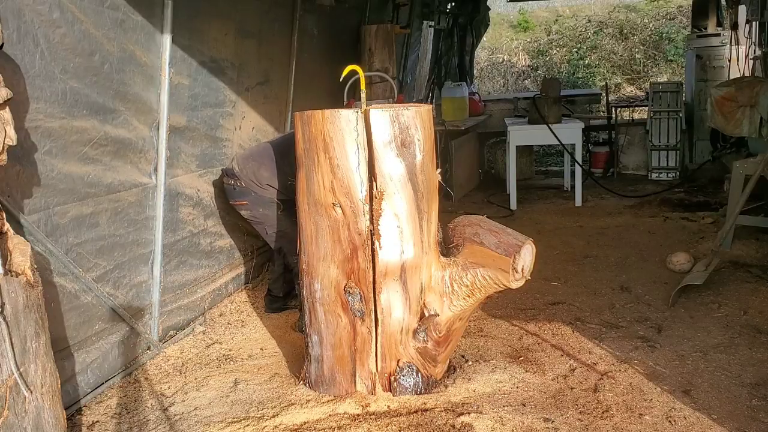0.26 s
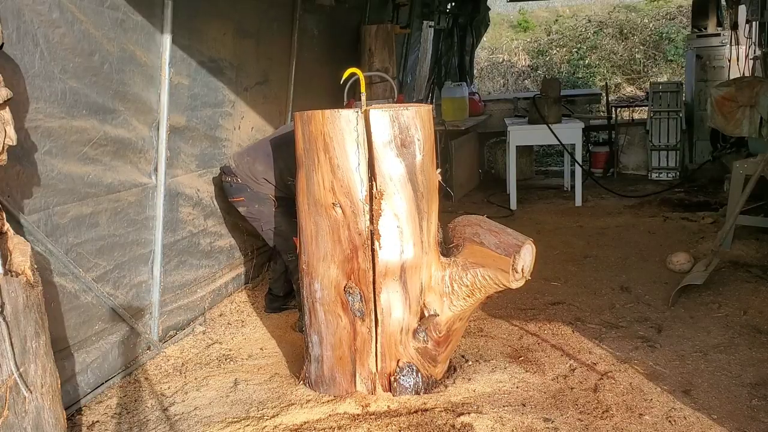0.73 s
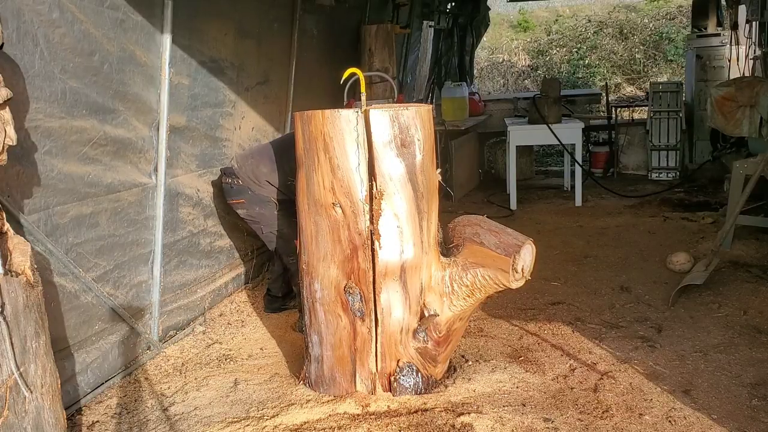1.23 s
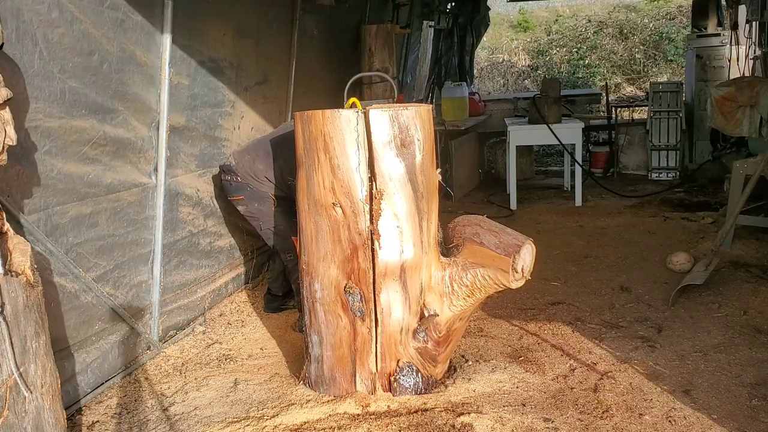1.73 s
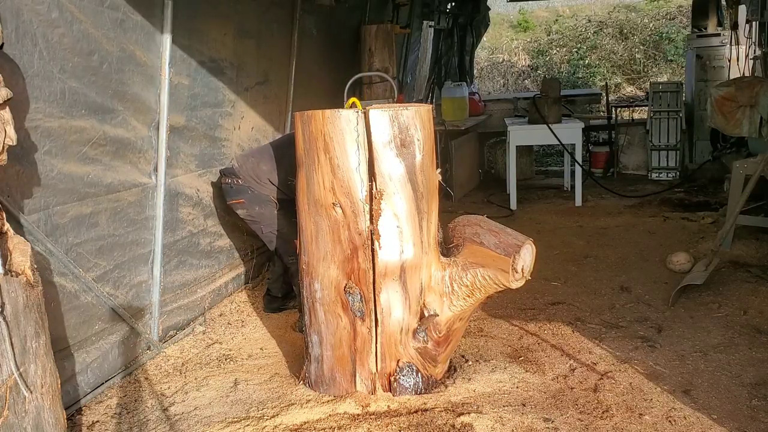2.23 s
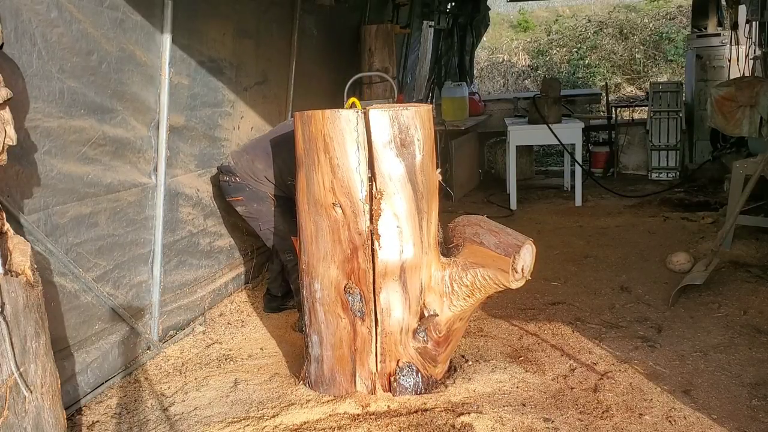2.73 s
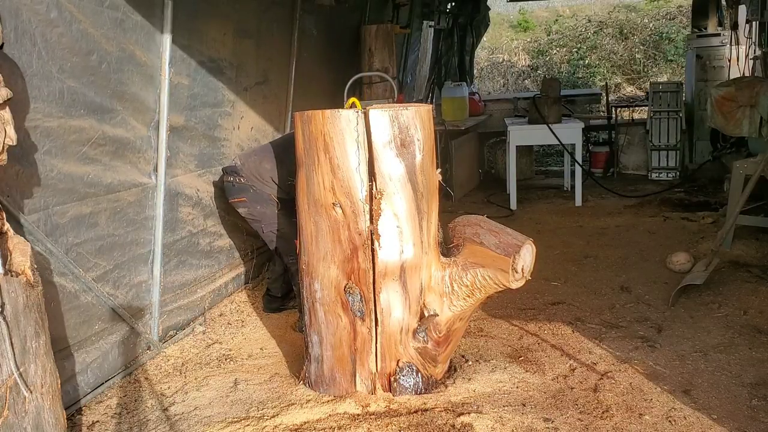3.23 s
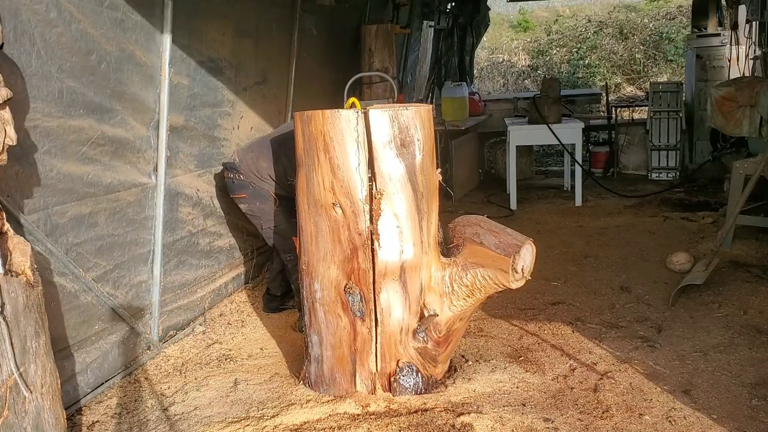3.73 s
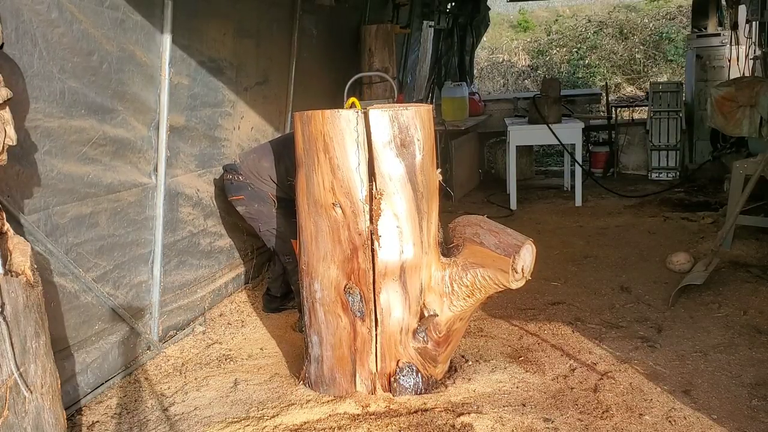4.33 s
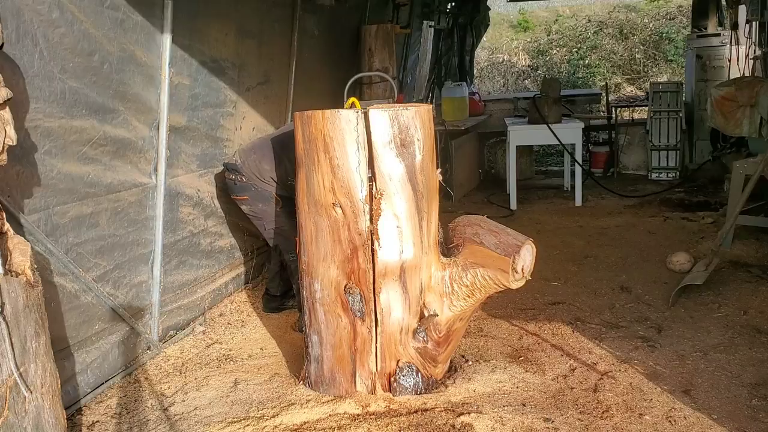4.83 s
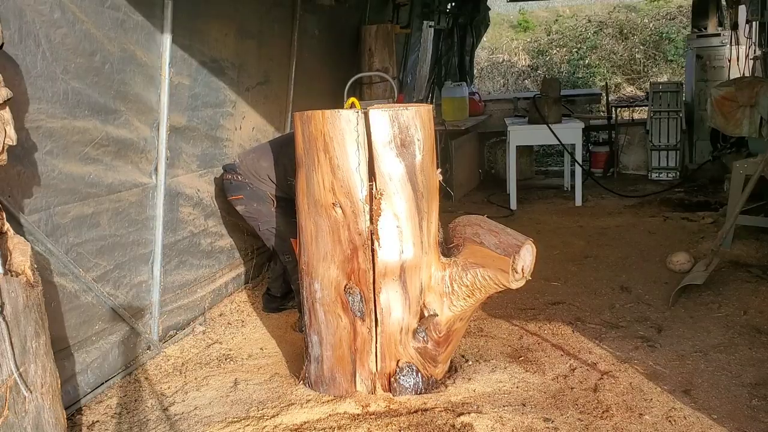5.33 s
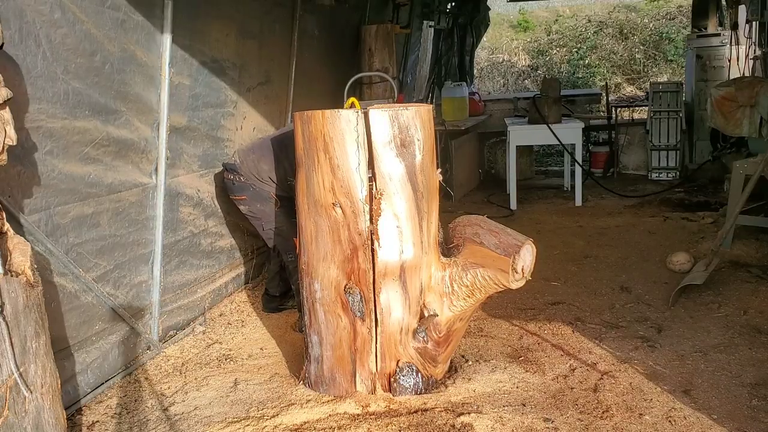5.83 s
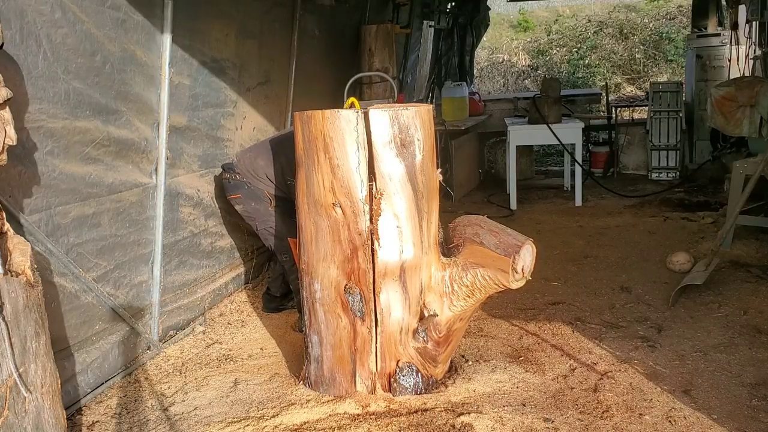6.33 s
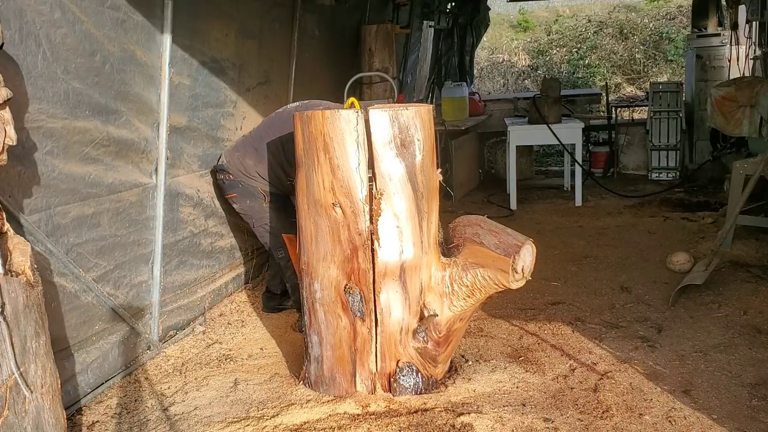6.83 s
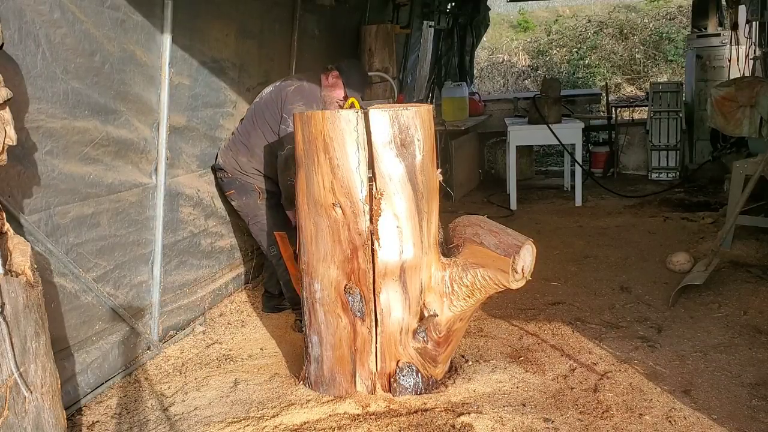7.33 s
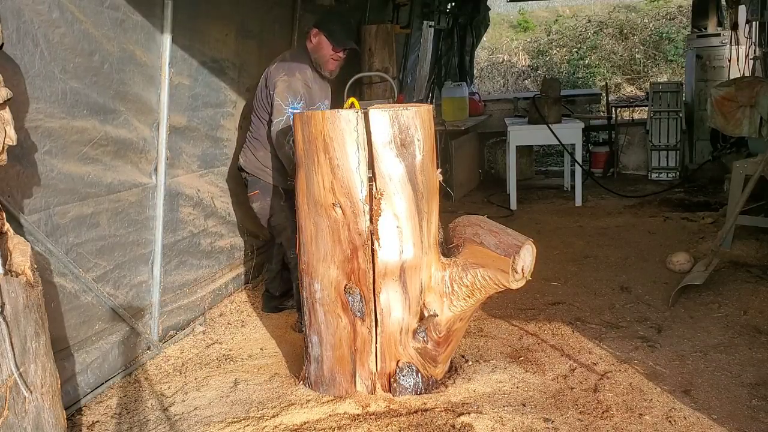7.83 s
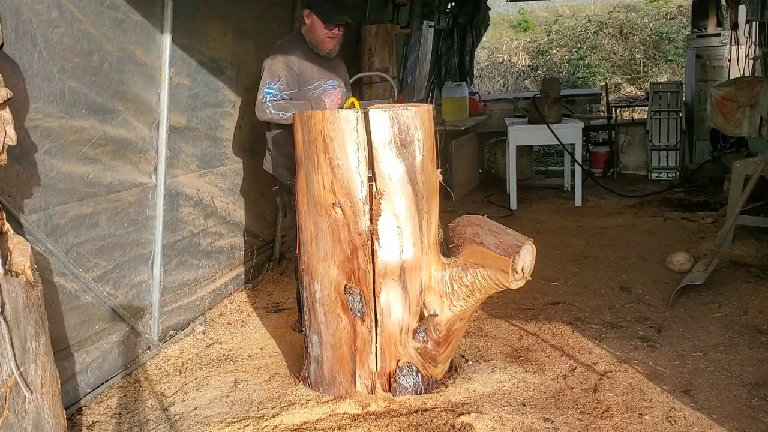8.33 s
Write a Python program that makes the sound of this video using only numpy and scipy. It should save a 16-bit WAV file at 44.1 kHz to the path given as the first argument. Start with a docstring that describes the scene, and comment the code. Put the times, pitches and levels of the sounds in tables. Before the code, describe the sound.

A quiet outdoor shed: faint low wavering rumble, thin airy hiss and soft shuffling of feet and clothes in sawdust. A faint knock comes at 0.3 s. At 0.5 s a steel hammer hits a steel wedge in a big log: low thump, sharp dense crack and bright metallic ring, thickened by quick shed echoes and fading within the second. Further blows land at about 1.4, 2.4, 3.4, 4.3, 5.3 and 6.2 s, each with a different mix of ringing tones and woody note. A wooden knock with a slight metal re-ring follows at 1.6 s, and another right after the fifth blow at 4.4 s. After the last ring dies, gentle rustling continues, with three very faint high chirps: rising at 7.5 s, level at 8.2 s, falling and very brief at 8.4 s. Stereo microphones face the log from the opposite side.

```python
"""A steel hammer drives a steel wedge into a big log under an open shed, on the far side from the microphones.
Throughout, filtered noise gives a distant rumble, shuffling in sawdust and still air; a modal knock comes at 0.3 s.
From 0.5 to 6.2 s come seven blows, about one a second: damped low modes thump, echoing noise bands crack, and
steel modes ring; the shed holds the sound, then it dies away. Knocks follow the second and fifth blows.
From 7.5 s come three faint sine chirps over the background: one rising, one level, one falling."""
import sys
import numpy as np
from scipy import signal
from scipy.fft import rfft, irfft, next_fast_len
from scipy.io import wavfile
from scipy.ndimage import uniform_filter1d

SR = 44100
rng = np.random.default_rng(int(sys.argv[2]) if len(sys.argv) > 2 else 0)


def digitize_waveform(pressure):
    """Quantize a signal to 16-bit integers and store it at the path in sys.argv[1].

    Rows of a 2-D input are taken as channels; values are limited to [-1, 1].
    """
    field = np.atleast_2d(pressure).T
    bounded = np.clip(field, -1, 1)
    quanta = np.round(bounded * 32767).astype(np.int16)
    wavfile.write(sys.argv[1], SR, quanta)


N = 377937

# Pan is always left minus right. Noise spectra give relative levels per hertz; noise() sets the rms to 1.
# Distant rumble: spectrum [f/Hz, level/dB] and its wavering rms [t/s, level/dB]
RUMBLE_SPECTRUM = [(15, -41), (30, -17.5), (55, -6), (75, 2), (110, -14.5), (160, -21.5), (300, -43)]
RUMBLE_LEVEL = [(0.0, -49), (0.33, -56.5), (0.71, -51), (1.29, -58.5), (1.67, -47), (2.22, -57),
                (2.67, -51.5), (2.98, -55), (4.32, -55), (4.42, -53), (5.13, -56), (5.54, -51),
                (5.8, -54.5), (6.52, -47.5), (6.83, -56.5), (7.83, -62.5), (7.99, -57.5), (8.57, -60.5)]
# Feet and clothes in sawdust: spectra of the body of the rustle and of its treble [f/Hz, level/dB]
SHUFFLE_SPECTRUM = [(80, -13.5), (160, -6), (260, -6), (500, -7), (800, -9), (1500, -18.5), (3000, -36.5)]
GRIT_SPECTRUM = [(500, -17), (1200, 0.5), (2300, -6), (3000, -10), (4500, -15), (9000, -34)]
# Movements [start of hold t/s, hold/s, level/dB, treble over body/dB, fall t60/s]
SHUFFLES = [(0.048, 0.034, -70.5, -10, 1.3), (0.31, 0.094, -58.5, -14, .9),
            (1.027, 0.073, -64.5, -12.5, 0.27), (1.783, 0.045, -63.5, -15, 0.86),
            (2.56, .12, -60, -2.5, 1.5), (3.073, .08, -69.5, -10.5, .9), (3.7, .1, -59.5, -14.5, .6),
            (4.651, .15, -70.5, -10.5, 1.3), (5.42, .05, -54, -7, 0.41), (5.7, .04, -71.5, -12, 0.45),
            (5.878, 0.092, -69.5, -17, 0.8), (6.42, 0.055, -54.5, -7.5, 0.99), (6.6, 0.055, -83, -4, .9),
            (7.68, .05, -71, -31, 0.43), (7.84, .08, -66, -23, .9), (7.96, 0.18, -61.5, -16, 0.47),
            (8.296, .11, -69.5, -22, .6)]
BED_DB, BED_TREBLE_DB = -71.5, -10  # steady rustle between movements, and its treble over it
SHUFFLE_RISE = 0.4  # t60 of the swell as a share of the fall's
# Still air: spectrum [f/Hz, level/dB]
AIR_SPECTRUM = [(1500, -12.5), (3000, 1), (5000, -8.5), (6500, -0.5), (8500, -6), (13000, -7), (16500, -2)]
AIR_DB = -87.5
LEFT_LAG = 18  # samples: the background comes from the right
# Chirps [t/s, length/s, from f/Hz, to f/Hz, level/dB]
CHIRPS = [(7.50, .13, 6240, 6400, -78.5), (8.239, .09, 5670, 5670, -83.5), (8.402, .016, 7290, 5210, -80)]
# Knocks [t/s, level/dB, pan/dB, share of t60, thud level/dB]
KNOCKS = [(0.323, -48, 7.5, 0.22, -27), (1.5913, -14.5, -6, 0.54, -25), (4.414, -22, 2.5, 0.35, 6)]
# Modes of the knock: the wood, and the steel wedge ringing again near 2 kHz
# [f/Hz, level/dB, t60/s before the share]
KNOCK_MODES = [(357.8, -2, 0.51), (418, -11.5, 0.25), (529, -1.5, 0.26), (612, 7.5, .07), (880, -1.2, 0.35),
               (990, 1, 0.1), (1260, -13.5, 0.14), (2043, -21, .4)]
# Spectrum of the shed's answer to a knock [f/Hz, level/dB]
KNOCK_SPECTRUM = [(100, -16), (400, 1), (1000, -3), (2500, -24), (6000, -32.5), (15000, -53)]
# Blows [t/s, pan of thump and crack/dB, thump/dB, swell time of the ring/s, far return over the usual/dB,
#  crack (wood/dB, log note f/Hz, its rise/dB, steel/dB, treble slope/dB per octave),
#  gain of upper twins/dB, (level/dB of each mode family, set by where the face lands),
#  (pan/dB of each family, as the hammer turns), (share of t60 for each grip)]
BLOWS = [(0.4962, -3.5, -25.5, 0.016, -0.5, (-0.4, 467.5, 11, 1, 0.5),
         -2.5, (-6, -13.5, 1.5, -5.5, -13, 7, -3.5), (-4, -6, -3, -2, 6.5, -.1, -6.5),
         (0.92, 0.37, 0.73, 0.42)), (1.407, 0.85, -25.5, 0.011, 4.66, (0.3, 559.5, 6, 3.4, -1.8),
         -0.5, (-13, 8.5, -2.1, 8, 8.5, 8.5, -10), (4, 1.7, 1.1, 3, -0.5, 3.5, -5.5),
         (0.95, 0.72, 0.62, .6)), (2.378, -1.75, -25, 0.022, 1.3, (0.2, 517.5, 12, 4, 0.5),
         4, (-4.5, -7.5, 2, 14.5, 15, 2.7, 6), (8.5, 2.5, -10.5, 1.5, 0.5, 2.5, 3.5),
         (.8, 1.295, 0.86, 0.58)), (3.372, 3.5, -21.5, 0.02, 0.5, (0.7, 281, 11.5, 3, -4.5),
         3, (-8.5, -8, -7.5, -10, -12, 3.5, -0.2), (4.5, -3.5, 6, 1, 6.5, 6.5, -3),
         (0.92, 0.95, 1.56, 1.42)), (4.349, -0.5, -30, 0.016, -2.2, (1.5, 397, 1, 1.1, -5.5),
         -1, (5.5, -10.5, 4, 3, -12.5, -9.5, 5.5), (6, 12, 1, 3.5, 0.5, -6, 8.5), (0.76, .45, 1.2, 1.2)),
         (5.297, -0.3, -24, 0.036, -4.5, (3.5, 426, 7, -0.6, -4.5), -3, (5, 5, -5.5, -4, 1, -5, -7),
         (3, -7, 9, -7, -6, 4.5, -15), (0.86, 0.31, 0.91, 0.89)),
         (6.248, -9, -30, 0.033, -0.5, (2.55, 428, 8.5, -2.5, -3.5),
         -2.7, (8, -12, -0.5, 4, -9.5, -6.5, 5.5), (-7, 2.5, 5, 3.5, -8.5, -0.5, -4.5),
         (0.97, .3, 0.76, 0.68))]
# Low modes of the log and the ground under it [f/Hz, level/dB, t60/s]
THUMP_MODES = [(63, -3, 0.14), (89.5, 1.5, 0.094), (132, -1.5, .07)]
THUMP_PAN_DB = -4.5  # added to the pan of the blow
# Crack bands, one entry each: centre [f/Hz]; level for a middling blow [level/dB]; shed decay [t60/s]
CRACK_HZ = [160, 230, 300, 370, 490, 620, 850, 1200, 2000, 3200, 5600, 9000, 13500]
CRACK_DB = [-36, -38, -40.5, -37, -39.5, -41.5, -40, -40.5, -28, -27, -29.5, -32.5, -34]
CRACK_T60 = [.15, 0.23, 0.038, 0.16, 0.054, 0.094, 0.14, 0.14, 0.18, .2, 0.15, 0.15, .14]
# Usual return from further off [level/dB]; left-right correlation, as long waves reach both sides alike
FAR_DB = [-18, -23.5, -26.5, -25.5, -25.5, -19.5, -20, -17.5, -32, -39, -43.5, -51, -50]
CRACK_ALIKE = [.85, .85, .85, .8, .75, .7, .5, .3, .1, 0, 0, 0, 0]
# Early echoes that hold the crack's level [t/s, level/dB]
SHED_ECHOES = [(0, -5.5), (.003, -5), (.008, -7), (0.024, -2.5), (0.036, -4.5), (.045, -5)]
SNAP_S, SNAP_DB = 0.0032, 3.5  # steel meets steel: a click centred just after the onset
WOOD_BELOW_HZ, TREBLE_FROM_HZ = 1500, 5600  # the log sounds below 1500 Hz, the steel above
NOTE_OCTAVES = 0.51  # 1/e half width of the log's note
FAR_T60 = 0.78  # s: return from further off, for crack and ring
# Modes of hammer and wedge, one entry each: [f/Hz]; middling blow before the swell [level/dB];
# decay before grip and twin changes [t60/s]; pan before the family's [pan/dB]
STEEL_HZ = [1990, 2062, 4135, 4434, 4625, 6400, 7343, 7629, 8826, 9133, 10635, 11189, 11579, 14900]
STEEL_DB = [-23, -30, -31, -23, -30, -50, -38.5, -33.5, -40.5, -38, -59.5, -34.5, -30.5, -50.5]
STEEL_T60 = [0.28, 0.24, 0.22, .22, 0.57, .22, .32, .24, 0.093, .45, 0.26, .28, 0.29, .13]
STEEL_PAN = [-2.5, -1, 2.5, -4.5, 0.5, 1, -4, 1.5, -7.5, -9.5, -4, -3.5, -6, -3.5]
# Scattered share: echoes and the rubbing wood beat against the ring [ratio]
STEEL_ROUGH = [0.27, 2.1, 1.6, 1.4, 0.5, 3, 0.71, 0.44, 3.5, .6, .8, 1.2, 0.7, 1.5]
# Share of the swell time: some modes bloom only as the hammer springs free [ratio]
STEEL_LATE = [.7, .3, 0.48, 0.74, 2.2, .7, 1.5, 0.49, 0.45, 1.7, 0.99, 0.72, 0.67, 0.87]
# Modes woken together [family index]; damped together by hand and wood [grip index]
STEEL_FAMILY = [0, 2, 1, 2, 3, 0, 6, 6, 2, 4, 0, 5, 5, 0]
STEEL_GRIP = [0, 0, 0, 0, 1, 3, 3, 0, 0, 1, 3, 2, 2, 3]
# Twins of close pairs [-1 lower, +1 upper, 0 unpaired]
STEEL_PAIR = [0, 0, 0, 0, 0, 0, -1, 1, 0, 0, 0, -1, 1, 0]
TWIN_HOLD = 0.37  # dB of longer t60 for each dB that a twin gains
RING_FROM_S = 0.055  # the echoes have filled the shed; the rings fade freely from here
RING_FAR_DB = -31.5  # usual fluttering return from further off
SCATTER_T60, SCATTER_RATE = 0.62, 120  # s, random values per s
TOP_HZ = 16000


def undb(db):
    """Decibel law: level to amplitude ratio."""
    return 10 ** (np.asarray(db, float) / 20)


def fade(t, t60):
    """Exponential decay: 60 dB in each t60, and unity before t = 0."""
    return np.exp(-np.log(1000) * np.maximum(t, 0) / t60)


def noise(size, points, alike):
    """Spectral shaping of stereo noise to unit rms; mid and side weights set the correlation."""
    hz, db = np.transpose(points)
    n = next_fast_len(size)
    log_hz = np.log(np.fft.rfftfreq(n, 1 / SR) + 1)
    gain = undb(np.interp(log_hz, np.log(hz), db, -120, -120))
    spectrum = rfft(rng.standard_normal((2, n))) * gain
    mid, side = irfft(spectrum, n)[:, :size]
    c = np.clip(alike, 0, 1)
    out = np.sqrt(1 + c) * mid + np.sqrt(1 - c) * side * np.array([[1], [-1]])
    return out / np.sqrt(np.mean(out ** 2))


def walk(size, rate):
    """Random modulation: independent values, rate per second, joined by slopes."""
    k = int(SR / rate)
    steps = np.repeat(rng.standard_normal(size // k + 1), k)
    return 1.7 * uniform_filter1d(steps, k)[:size]


def pan(db):
    """Level-difference stereo: left and right gains, db apart."""
    return undb(np.array([[db], [-db]]) / 2)


def add(out, s, sound):
    """Superposition: sum a sound into the scene from s seconds."""
    i = int(s * SR)
    out[:, i:i + sound.shape[1]] += sound[:, :N - i]


def struck(t, modes, share, push_s):
    """Modal excitation by one soft push: damped sines, neighbours swinging against each other."""
    rings = 0
    for k, (hz, db, t60) in enumerate(modes):
        sine = np.sin(2 * np.pi * hz * t)
        rings = rings + (-1) ** k * undb(db) * fade(t, share * t60) * sine
    return rings * np.minimum(t / push_s, 1)


def rumble():
    """Slowly modulated low-frequency noise: a distant rumble, alike on both sides, that wavers."""
    level_db = np.interp(np.arange(N) / SR, *np.transpose(RUMBLE_LEVEL))
    return noise(N, RUMBLE_SPECTRUM, 1.0) * undb(level_db)


def movements():
    """Addition of powers: a steady bed plus movements that swell, hold and fall; gains of body and treble."""
    t = np.arange(N) / SR
    body = undb(2 * BED_DB)
    grit = undb(2 * (BED_DB + BED_TREBLE_DB))
    for s, hold, db, treble_db, t60 in SHUFFLES:
        rise = fade(s - t, SHUFFLE_RISE * t60)
        fall = fade(t - s - hold, t60)
        power = (undb(db) * rise * fall) ** 2
        body = body + power
        grit = grit + power * undb(2 * treble_db)
    return np.sqrt(body), np.sqrt(grit)


def shuffle():
    """Friction noise: feet and clothes in sawdust, body and treble flickering separately."""
    body, grit = movements()
    low = noise(N, SHUFFLE_SPECTRUM, 0.6) * body * undb(1.1 * walk(N, 28))
    high = noise(N, GRIT_SPECTRUM, 0.13) * grit * undb(1.4 * walk(N, 41))
    return low + high


def background():
    """Time-difference stereo: rumble, rustle and still air reach the left side later."""
    air = noise(N, AIR_SPECTRUM, 0.1) * undb(AIR_DB)
    left, right = rumble() + shuffle() + air
    return np.array([np.roll(left, LEFT_LAG), right])


def chirp(length, hz0, hz1):
    """Phase integration: a thin whistle running straight from one frequency to another, or level if equal."""
    hz = np.linspace(hz0, hz1, int(length * SR))
    return np.ones((2, 1)) * np.hanning(len(hz)) * np.sin(2 * np.pi * np.cumsum(hz) / SR)


def knock(share, thud_db):
    """Modal impact: wood and re-ringing wedge, a thud, a click and the shed's slower noisy answer."""
    t = np.arange(int(0.6 * SR)) / SR
    modes = undb(-11.5) * struck(t, KNOCK_MODES, share, 0.003)
    thud = undb(thud_db) * struck(t, [(183, 0.0065, 0.022)], 0.89, 0.0012)
    click = undb(-27) * noise(len(t), [(600, -0.5), (2500, 1.0), (6000, -14), (15000, -31.5)], 0.4)
    click = click * fade(t - 0.004, 0.035) * np.minimum(t / 0.0034, 1) ** 2
    decay = undb(-21.5) * fade(t - 0.03, 0.4 * share) + undb(-36) * fade(t, 0.79)
    shed = noise(len(t), KNOCK_SPECTRUM, 0.77) * decay * np.minimum(t / 0.015, 1)
    return modes + thud + click + shed


def thump(t, db):
    """Low-frequency modal response: the blow sets log and ground swinging."""
    return undb(db) * pan(THUMP_PAN_DB) * struck(t, THUMP_MODES, 1, 0.0074)


def crack_db(wood_db, note_hz, note_db, steel_db, slope_db):
    """Impact spectrum: the log's note moves as the split opens; softer contact dulls the top."""
    hz = np.array(CRACK_HZ)
    wood = wood_db + note_db * np.exp(-(np.log2(hz / note_hz) / NOTE_OCTAVES) ** 2)
    steel = steel_db + slope_db * np.maximum(np.log2(hz / TREBLE_FROM_HZ), 0)
    return CRACK_DB + np.where(hz < WOOD_BELOW_HZ, wood, steel)


def crack(t, return_db, band_db):
    """Reverberation by bands: early echoes hold the noise, each band decays, a faint far return follows."""
    hold_s, hold_db = np.transpose(SHED_ECHOES)
    # single echoes stand out of the dense ones as a clatter in all bands
    early = undb(np.interp(t, hold_s, hold_db) + 0.32 * walk(len(t), 500)) * np.minimum(t / 0.003, 1)
    snap = undb(SNAP_DB) * np.exp(-((t - SNAP_S) / 0.00032) ** 2)
    edges = [110, *CRACK_HZ, 15900]  # each band fades out at its neighbours' centres
    bands = zip(edges, CRACK_HZ, edges[2:], band_db, CRACK_T60, FAR_DB, CRACK_ALIKE)
    out = 0
    for low, hz, high, db, t60, far_db, alike in bands:
        # long waves pass round the log at once: echoes hold them for less time, and they carry little snap
        short = min(1, (hz / 900) ** 0.5)
        near = (early + short ** 2 * snap) * fade(t - hold_s[-1] * short, t60)
        far = undb(far_db + return_db) * fade(t, FAR_T60) * np.minimum(t / 0.054, 1)
        slopes = [(low, -20), (np.sqrt(low * hz), -3), (hz, 0), (np.sqrt(hz * high), -3), (high, -20)]
        band = noise(len(t), slopes, alike)
        flicker = undb(2.0 * short ** 2 * walk(len(t), 300))  # short waves flicker from echo to echo
        out = out + undb(db) * band * (near + far) * flicker
    return out


def ring(t, swell_s, return_db, dbs, t60s, pans):
    """Modal ringing with scatter: steel modes swell as echoes add, a quarter cycle apart left to right."""
    quarter = np.array([[1], [1j]])
    out = 0
    for hz, rough, late, db, t60, pan_db in zip(STEEL_HZ, STEEL_ROUGH, STEEL_LATE, dbs, t60s, pans):
        swell = (1 - np.exp(-t / (late * swell_s))) ** 2
        beat = np.array([walk(len(t), SCATTER_RATE) + 1j * walk(len(t), SCATTER_RATE) for _ in range(2)])
        scatter = rough * fade(t, SCATTER_T60)
        near = (quarter + scatter * beat) / np.sqrt(1 + scatter ** 2)
        near = near * fade(t - RING_FROM_S, t60)
        far = undb(RING_FAR_DB + return_db) * beat * fade(t, FAR_T60)
        far = far * fade(hz, 28000)  # the air dulls the long way round
        tone = np.exp(2j * np.pi * (hz * t + rng.random()))
        out = out + undb(db) * swell * ((pan(pan_db) * near + far) * tone).real
    return out


def blow(pan_db, thump_db, swell_s, return_db, colour, twin_db, family_db, family_pan, grip):
    """Impact and modal coupling: one strike thumps and cracks the log and wakes the steel by families."""
    t = np.arange(int(1.3 * SR)) / SR
    wood = thump(t, thump_db) + crack(t, return_db, crack_db(*colour))
    twin_gain = twin_db * np.array(STEEL_PAIR)
    ring_db = STEEL_DB + np.take(family_db, STEEL_FAMILY) + twin_gain
    t60s = STEEL_T60 * np.take(grip, STEEL_GRIP) * undb(TWIN_HOLD * twin_gain)
    pans = STEEL_PAN + np.take(family_pan, STEEL_FAMILY)
    return pan(pan_db) * wood + ring(t, swell_s, return_db, ring_db, t60s, pans)


def scene():
    """Superposition of sources: chirps, knocks and blows over the background."""
    out = background()
    for s, length, hz0, hz1, db in CHIRPS:
        add(out, s, undb(db) * chirp(length, hz0, hz1))
    for s, db, pan_db, share, thud_db in KNOCKS:
        add(out, s, undb(db) * pan(pan_db) * knock(share, thud_db))
    for s, *settings in BLOWS:
        add(out, s, blow(*settings))
    return out


def record(dry):
    """Band limitation: a steep elliptic low-pass cuts the top."""
    low_pass = signal.ellip(8, 0.2, 70, TOP_HZ, fs=SR, output="sos")  # order, ripple/dB, stopband/dB
    return signal.sosfilt(low_pass, dry)


dry = scene()
out = record(dry)
digitize_waveform(out)
```